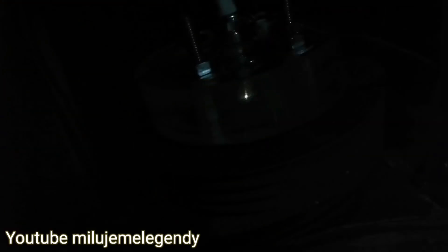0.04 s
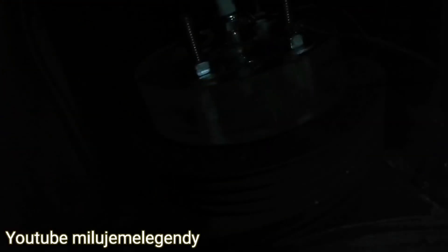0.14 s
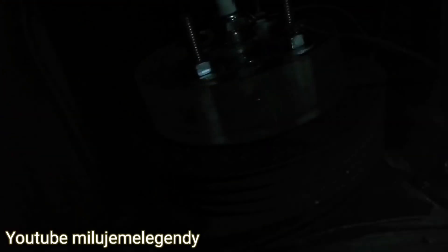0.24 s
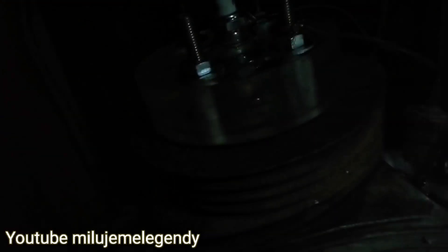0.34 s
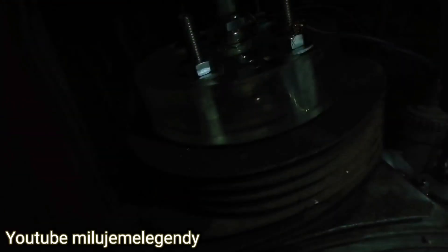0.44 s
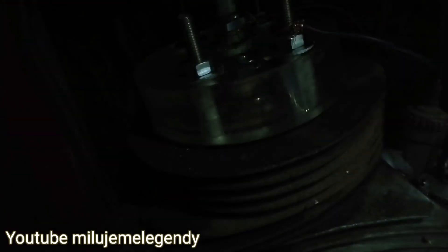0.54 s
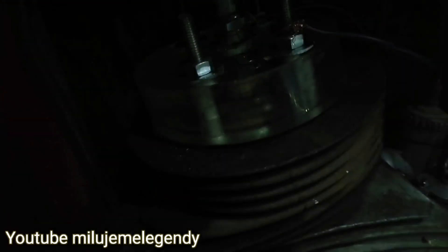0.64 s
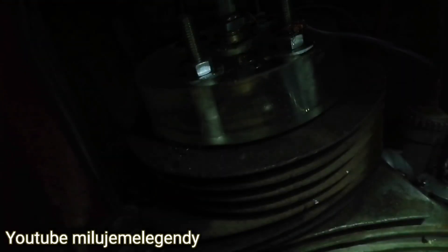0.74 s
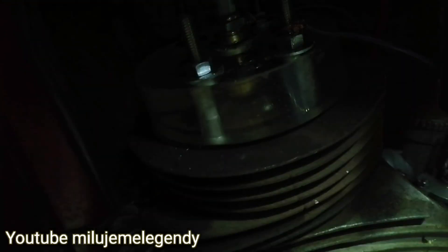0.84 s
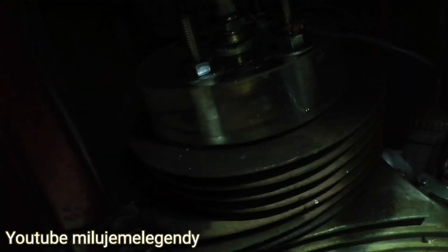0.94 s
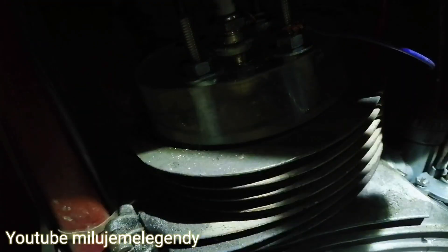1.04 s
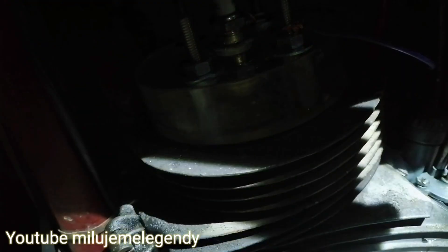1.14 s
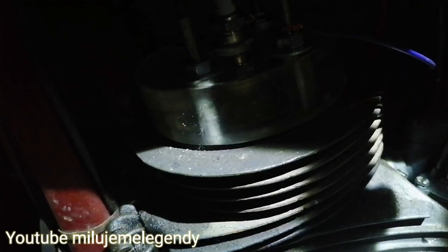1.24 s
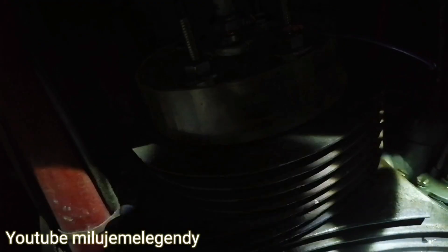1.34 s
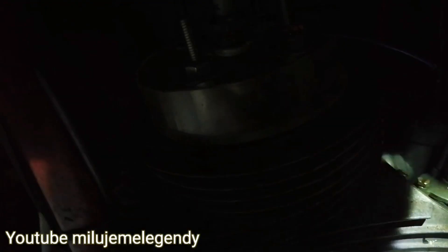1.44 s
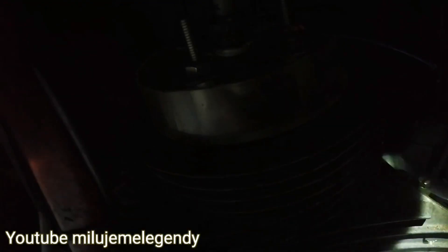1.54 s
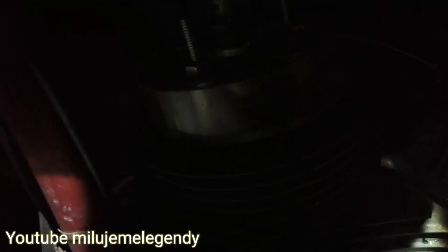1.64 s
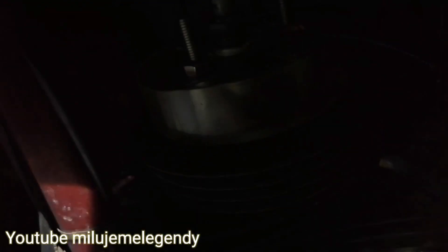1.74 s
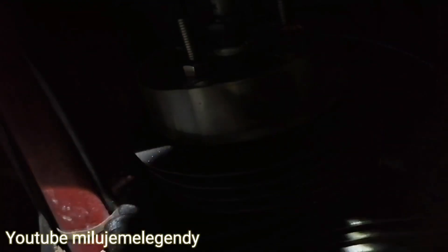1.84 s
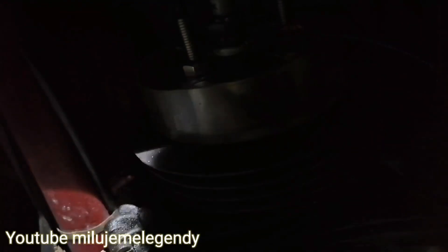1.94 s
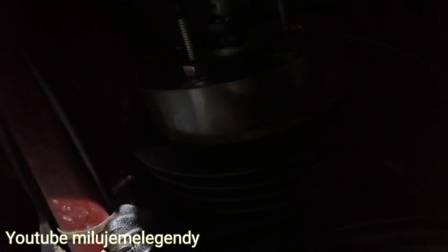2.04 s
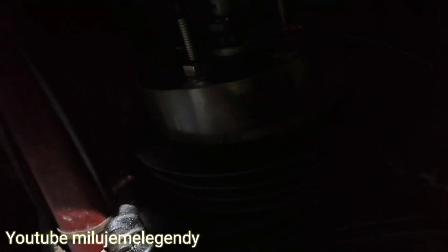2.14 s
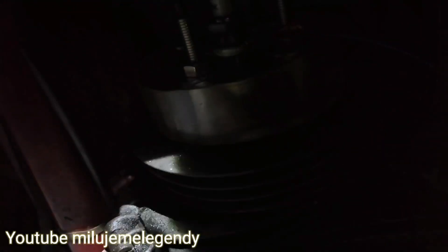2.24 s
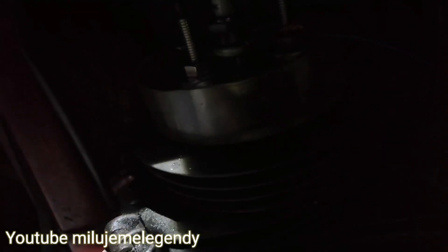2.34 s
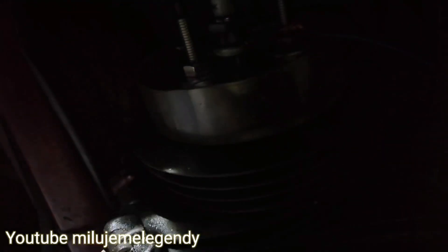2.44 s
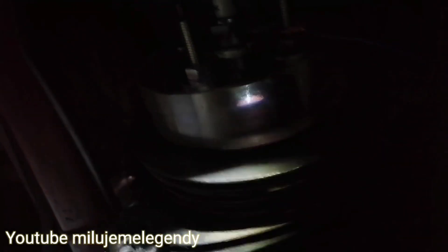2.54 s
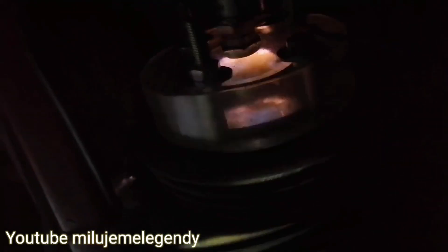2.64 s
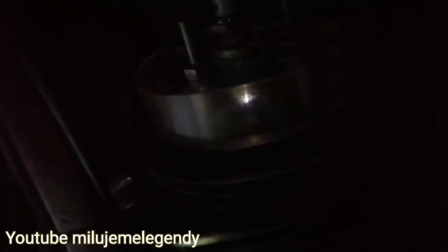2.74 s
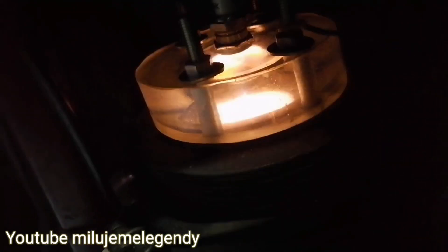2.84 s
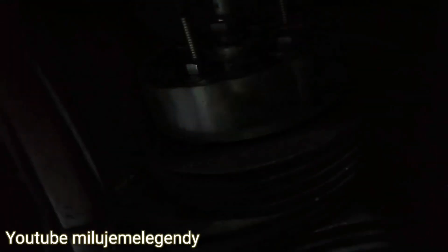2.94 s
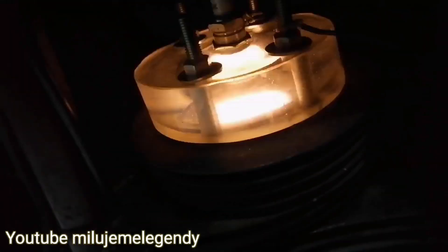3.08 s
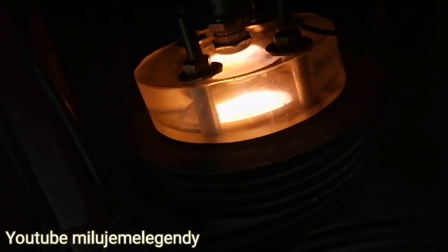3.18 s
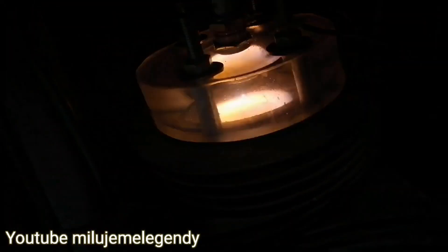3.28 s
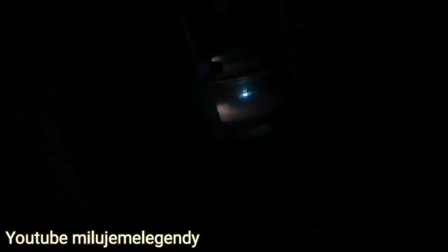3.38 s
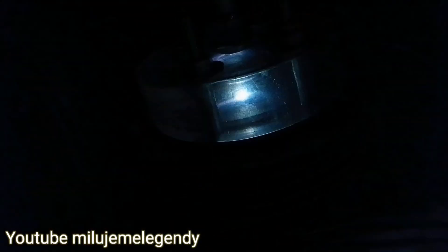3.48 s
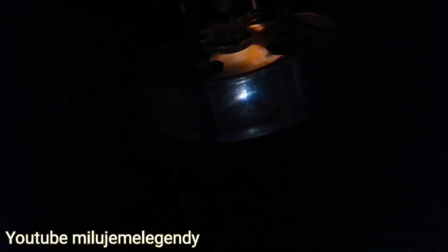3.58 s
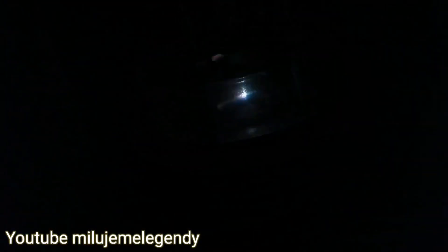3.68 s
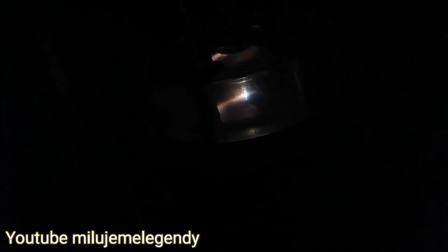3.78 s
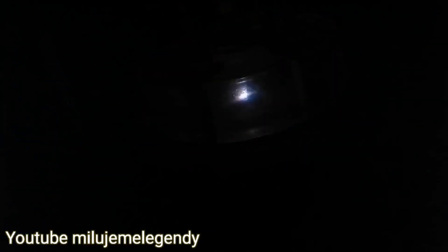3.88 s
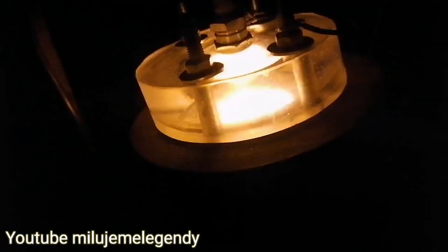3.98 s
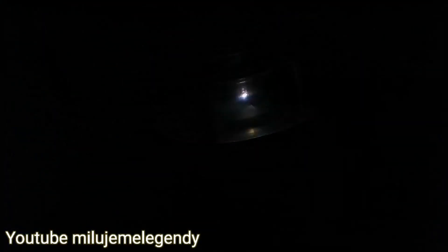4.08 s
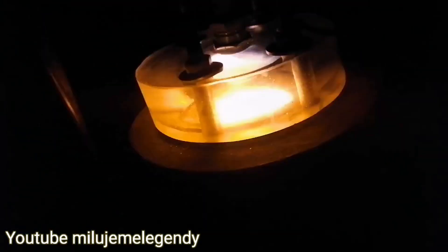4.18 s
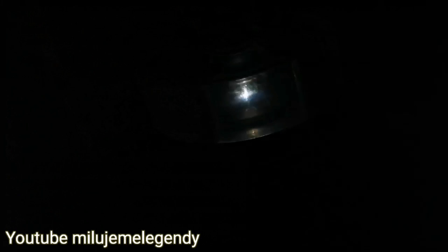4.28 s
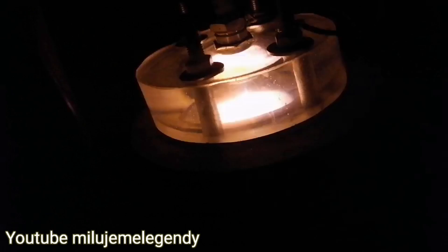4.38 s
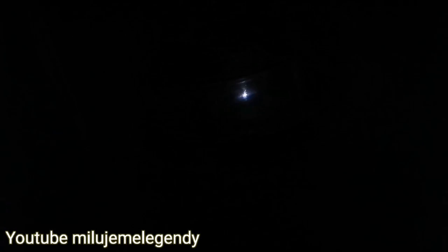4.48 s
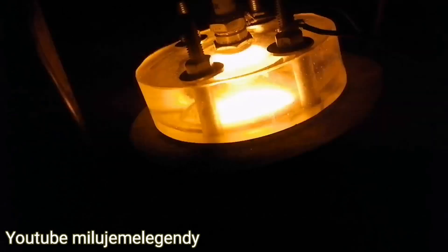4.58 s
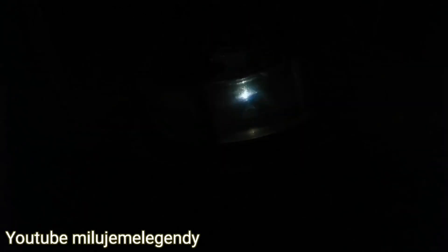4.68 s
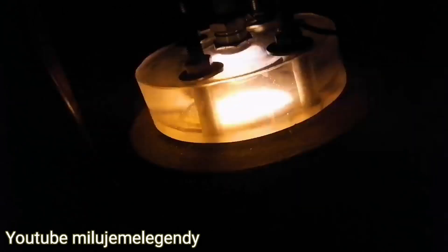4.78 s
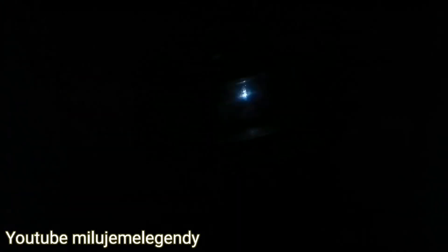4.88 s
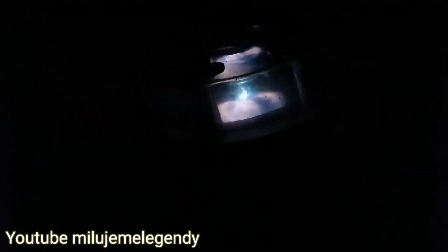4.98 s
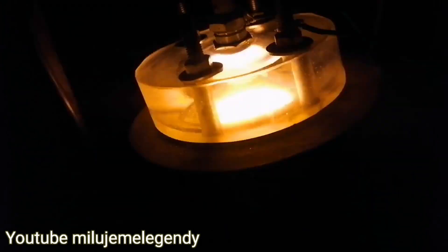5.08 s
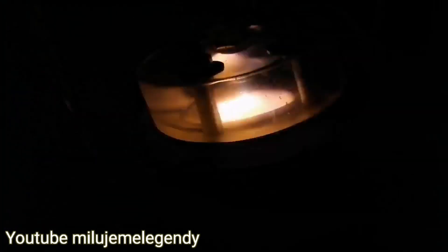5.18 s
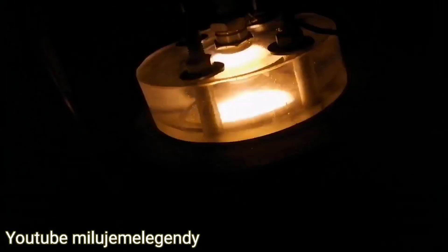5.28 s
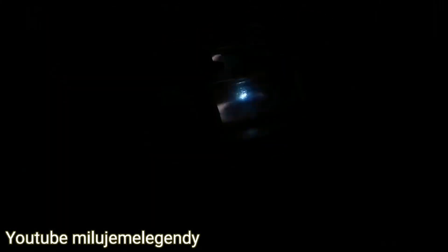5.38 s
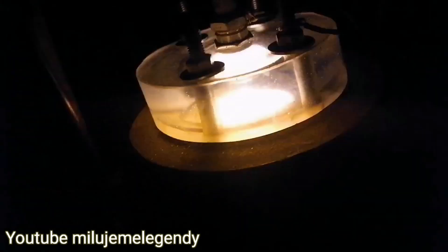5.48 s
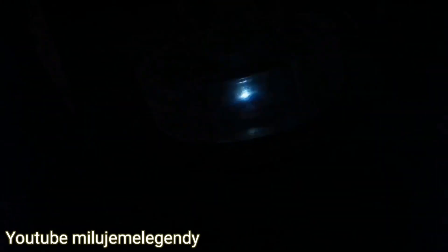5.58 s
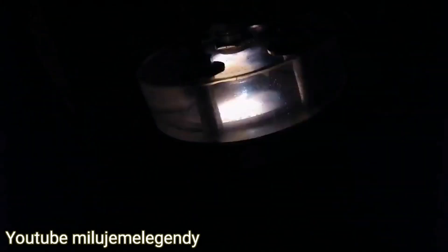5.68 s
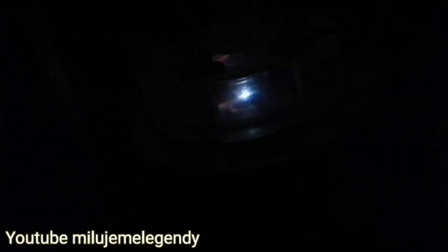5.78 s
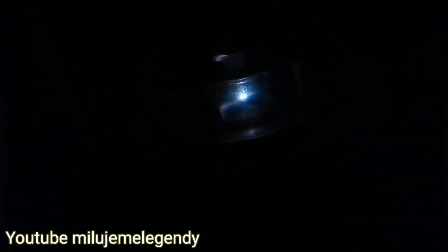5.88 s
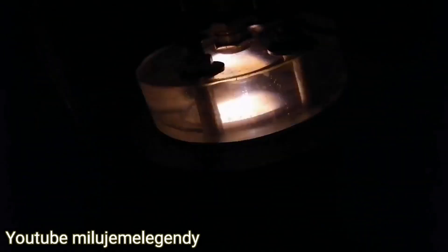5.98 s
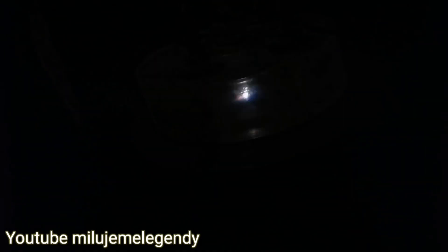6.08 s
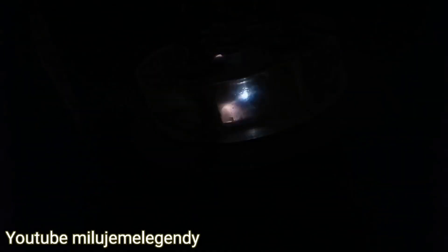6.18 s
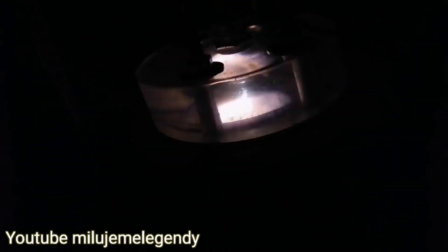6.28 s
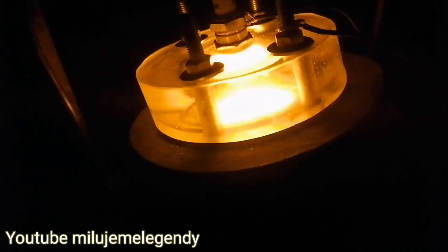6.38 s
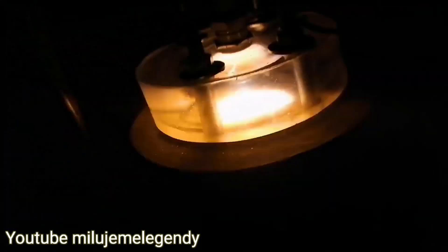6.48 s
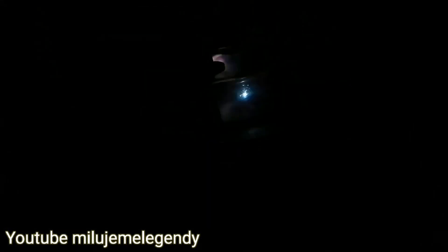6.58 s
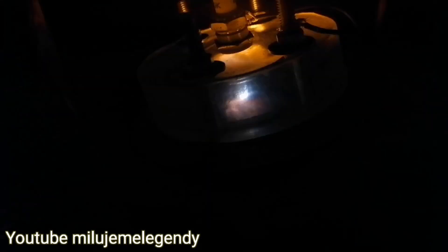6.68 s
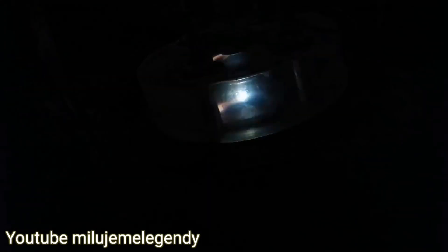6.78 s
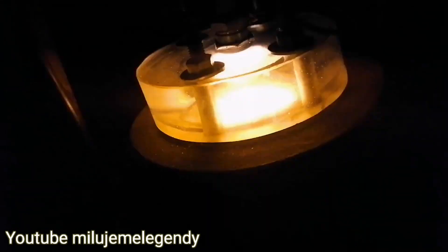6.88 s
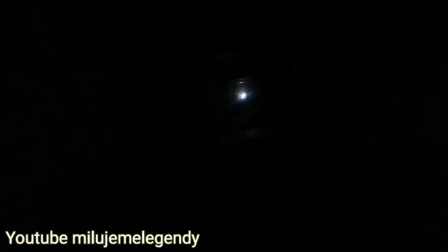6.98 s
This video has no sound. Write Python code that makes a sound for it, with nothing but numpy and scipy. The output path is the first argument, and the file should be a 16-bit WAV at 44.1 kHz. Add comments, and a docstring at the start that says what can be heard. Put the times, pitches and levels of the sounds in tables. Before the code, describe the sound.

A small engine stalls with quick damped knocks, then is almost still apart from isolated metal clicks and soft air. The kick starter is nudged, scrapes, and is kicked hard; its pawl clicks back rapidly as the engine catches. Irregular firing follows, speed surging and sagging, with raspy intake, ringing cylinder and sharp pulsing hiss. Close stereo microphones, dry with a short garage reverberation.

```python
"""A small single-cylinder two-stroke engine, close to the microphones in a garage.
It runs down and stalls (shaped rumble), is nudged over by the kick starter (damped knocks, air wheezing
past the piston), is kicked, and catches while the starter ratchet whirrs back as a train of clicks.
It then sputters on, each firing kicking the crank, whose angle times every periodic source: on each turn
gas hisses out at the head (gated noise), the cylinder rings and the exhaust port pops (excited resonances)."""
import sys
import numpy as np
from scipy import signal
from scipy.fft import rfft, irfft, next_fast_len
from scipy.io import wavfile
from scipy.ndimage import map_coordinates

SR = 44100
rng = np.random.default_rng(int(sys.argv[2]) if len(sys.argv) > 2 else 0)


def to_wav(sig):
    """Store sig (one row per channel, or 1-D mono) as 16-bit WAV at the path in sys.argv[1].

    Samples outside -1..1 are clipped; the rate is SR.
    """
    pcm = np.clip(np.atleast_2d(sig), -1, 1) * 32767
    pcm = np.round(pcm).astype(np.int16)
    wavfile.write(sys.argv[1], SR, pcm.T)  # frames by channels


N = 309582
TIME = np.arange(N) / SR  # seconds
CATCH_S = 3.05  # time at which the engine catches

# The charge burns only now and then. Each row: time in seconds, relative level of the rattle in dB,
# half length in seconds, crank speed gained in turns per second.
FIRINGS = [(3.27, -39.0, 0.026, 7.6), (3.35, -42.0, 0.03, 10.2), (3.45, -39.0, 0.06, 15.2),
           (3.53, -38.0, 0.025, 1.6), (3.715, -30.5, 0.012, 6.2), (3.92, -28.0, 0.008, 2.7),
           (4.03, -29.5, 0.009, 2.9), (4.17, -28.0, 0.007, 4.5), (4.375, -32.0, 0.014, 5.4),
           (4.585, -32.0, 0.018, 5.2), (4.735, -32.0, 0.013, 5.5), (4.96, -33.0, 0.013, 6.3),
           (5.0, -36.0, 0.022, 3.3), (5.24, -37.0, 0.038, 13.7), (5.4, -31.5, 0.013, 10.3),
           (5.49, -33.5, 0.022, 6.0), (5.65, -32.0, 0.014, 7.9), (5.9, -35.5, 0.015, 6.8),
           (6.175, -34.0, 0.016, 5.9), (6.45, -46.0, 0.03, 3.9), (6.535, -35.0, 0.035, 12.2),
           (6.66, -34.0, 0.013, 6.2), (6.815, -32.5, 0.02, 9.5)]
# The piston is pushed along without firing. Each row: time in seconds, half length in seconds,
# relative level of the rush of air in dB, relative level of the rumble in dB.
PUSHES = [(0.247, 0.18, -55, -66), (0.764, 0.038, -63, -74), (1.13, 0.16, -59.5, -58),
          (1.35, 0.18, -52.5, -70), (1.85, 0.086, -59.5, -65), (2.26, 0.064, -61, -69),
          (2.383, 0.037, -46.5, -50), (2.507, 0.042, -67, -55.5), (2.62, 0.033, -47.5, -68),
          (2.724, 0.041, -37.5, -28.5), (2.95, 0.081, -42.5, -42), (3.036, 0.064, -52, -34.5)]
# Resonances of the finned cylinder. Each row: centre in Hz, width in Hz, relative level in dB.
CYLINDER = [(2160, 2500, -23), (2903, 143, 3.5), (2971, 213, 0), (3470, 65, -19.5)]
# Spectrum of rushing air. Each row: frequency in Hz, relative density in dB per Hz.
RUSH = [(200, 8.5), (600, 8), (1200, 9), (1600, 7), (2200, 9), (3200, 7.5), (4000, 1.5), (5200, 7.5),
        (7200, 12), (8400, 7.5), (11000, -0.5), (14000, -3), (16000, -9)]
# Stereo balance of the head leak. Each row: frequency in Hz, left minus right in dB.
LEAK_LEAN = [(2500, -5), (4500, 7), (7000, -15), (8500, -2), (11000, -10), (14500, -19.5)]


def amp(db):
    """Decibels to an amplitude ratio."""
    return 10 ** (np.asarray(db) / 20)


def unit(x):
    """Normalise x to an rms of 1."""
    return x / np.sqrt(np.mean(x ** 2) + 1e-20)


def along(points, hz):
    """Interpolate (Hz, value) points on a logarithmic frequency axis."""
    f, v = np.transpose(points)
    return np.interp(np.log(hz + 1), np.log(f + 1), v)


def curves(rows):
    """Interpolate each column after the time linearly, one value per sample."""
    s, *columns = np.transpose(rows)
    return [np.interp(TIME, s, column) for column in columns]


def wobble(rate):
    """Slow random modulation: a smooth curve through rate random knots a second."""
    knots = rng.standard_normal(int(N * rate / SR) + 4)
    return map_coordinates(knots, [TIME * rate])


def filtered(x, response):
    """Linear filtering: the spectrum of x times a complex response of frequency."""
    m = next_fast_len(N + SR // 2)
    hz = np.fft.rfftfreq(m, 1 / SR)
    return irfft(rfft(x, m) * response(hz), m)[..., :N]


def coloured(x, spectrum):
    """Spectral shaping by (Hz, dB) points, at rms 1."""
    return unit(filtered(x, lambda hz: amp(along(spectrum, hz))))


def resonate(x, modes):
    """Modal response: parallel second-order resonances of alternating sign, at rms 1."""
    def bank(f):
        total = 0
        for k, (centre, width, db) in enumerate(modes):
            damping = 1j * f * width
            total = total + (-1) ** k * amp(db) * damping / (centre * centre - f * f + damping)
        return total
    return unit(filtered(x, bank))


def gliding(x, centre_hz, width_hz):
    """Heterodyning: a fixed low-pass pole on a moving carrier makes one sliding resonance, at rms 1."""
    carrier = np.exp(2j * np.pi * np.cumsum(centre_hz) / SR)
    pole = np.exp(-np.pi * width_hz / SR)
    return unit((signal.lfilter([1], [1, -pole], x / carrier) * carrier).real)


def spread(pair):
    """Partial coherence: two unrelated signals become left and right, alike in the bass."""
    # Each row: frequency in Hz, correlation of left and right.
    alike = [(30, 0.18), (70, 1), (180, 0.72), (350, 0.92), (600, 0.39), (1100, 0.19), (2500, 0.06),
             (8000, 0.011)]

    def mid_side_gains(hz):
        turn = np.arccos(np.clip(along(alike, hz), -1, 1)) / 2
        return np.array([np.cos(turn), np.sin(turn)])
    mid, side = filtered(pair, mid_side_gains)
    return np.array([mid + side, mid - side])


def noise():
    """Stereo random noise, partly coherent between the channels."""
    return spread(rng.standard_normal((2, N)))


def panned(x, db):
    """Level difference between the channels: x leaning left by db."""
    return x * amp(np.array([[.5], [-.5]]) * db)


def leaning(x, lean):
    """Frequency-dependent level difference between the channels, with an overall gain of 0.91."""
    return filtered(x, lambda hz: panned(0.91, along(lean, hz)))


def swells(rows):
    """Gaussian envelopes, one for each (s, dB, half length) row, summed in power."""
    power = 0
    for s, db, half in rows:
        power = power + amp(db) ** 2 * np.exp(-np.minimum(((TIME - s) / half) ** 2, 60))
    return np.sqrt(power)


def add(track, s, sound):
    """Superposition: mix a sound in at time s."""
    start = max(round(s * SR), 0)
    track[..., start:start + sound.shape[-1]] += sound[..., :N - start]


def level_running(gate):
    """Normalise a gate to rms 1 over the time after the engine catches."""
    return gate / np.sqrt(np.mean(gate[TIME > CATCH_S] ** 2))


def stroke(turns, centre, width, rest_db, scatter_db):
    """Periodic gating: opens once a turn around a crank angle, each time with new strength."""
    angle = turns - centre + .5
    size = amp(scatter_db * rng.standard_normal(256))[np.floor(angle).astype(int)]
    return level_running(size * np.exp(-((angle % 1 - .5) / width) ** 4) + amp(rest_db))


def blows(turns, angle, scatter_db):
    """Impulsive excitation: one sharp blow a turn at a crank angle, each of new strength."""
    count = np.arange(int(turns[-1]) + 1)
    at = np.searchsorted(turns, count + max(angle, 1e-6))
    strength = amp(scatter_db * rng.standard_normal(len(count)))
    return unit(np.bincount(at, strength, N + 1)[:N])


def engine():
    """Crank-synchronous sources: exhaust, intake, burning, cylinder, leak (angle 0 = top of the stroke)."""
    cruise_speed = 36  # turns per second
    boom_delay_s, boom_half_s = 0.037, 0.023
    speed = crank()
    running = np.clip((TIME - CATCH_S) / 0.013, 0, 1)
    turns = np.cumsum(speed * (running > 0)) / SR
    octaves = np.log2(speed / cruise_speed)
    fired = swells([(s + boom_delay_s, 0, boom_half_s) for s, *_ in FIRINGS])
    # The throttle. Each row: time in seconds, relative exhaust level in dB,
    # intake roar at cruising speed in dB.
    throttle = [(3.05, -32.5, -53), (3.2, -30.5, -48), (3.28, -31, -29.5), (3.5, -26, -34.5),
                (3.7, -26.5, -32), (4.0, -22.5, -32.5), (4.2, -25.5, -37.5), (4.48, -24.5, -39.5),
                (5.15, -26, -38), (5.32, -28, -33), (5.6, -25.5, -38), (5.95, -26.5, -34),
                (6.2, -25.5, -35), (6.4, -27, -38.5), (6.65, -28, -38), (7.02, -28, -33)]
    exhaust_db, intake_db = curves(throttle)
    flow = intake(turns)
    pops = amp(exhaust_db - 4.5) * exhaust(turns, fired)
    sources = pops + roar(flow, intake_db, octaves) + burn(flow)
    return running * (sources + cylinder_ring(turns, octaves) + wash(octaves) + head_leak(turns))


def crank():
    """Angular momentum: each firing kicks the crank (turns per second) and drag slows it exponentially."""
    catch_speed, drag_per_s = 24.2, 1  # turns per second; rate of the exponential slowing, per second
    kicks = 0
    for s, _, half, gain in FIRINGS:
        bell = np.exp(-np.minimum(((TIME - s) / half) ** 2, 60))
        kicks = kicks + gain * bell / (half * np.sqrt(np.pi))
    coasting = np.exp(-drag_per_s * np.maximum(TIME - CATCH_S, 0))
    return coasting * (catch_speed + np.cumsum(kicks / coasting) / SR)


def exhaust(turns, fired, port=0.1901, swing=0.4794, sway_db=2, throb_db=-8, boom_db=-7):
    """Pipe resonance: a pulse and a gush each turn ring it over a harmonic throb, which booms after a firing."""
    # Resonances of exhaust and crankcase. Each row: centre in Hz, width in Hz, relative level in dB.
    pipe = [(62, 11, -21), (96, 17, -18), (124.3, 16, -2.5), (138.8, 13, 1.5), (202.4, 11.6, -0.5),
            (256.3, 28, -1.5), (328, 63, -0.5), (368.6, 34.4, 3), (392, 126, -8.5), (533, 193, -6.5),
            (572, 93, -5.5)]
    # The smooth pressure swing of each turn. Each row: multiple of crank speed, relative level in dB.
    orders = [(1, -9.5), (2, -7), (3, 2), (4, 1.5), (5, -6), (6, -12.5), (7, -10), (8, -7), (9, -7),
              (10, -4)]
    # The silencer's resonance: centre in Hz, width in Hz, relative level in dB.
    silencer = (143, 30, 0)
    fired_gain_db = 2.5
    rough = .35  # share of power in the gush
    gush = noise() * stroke(turns, centre=.33, width=.16, rest_db=-8, scatter_db=2) * (turns > 0)
    pulses = blows(turns, port, scatter_db=2)
    pops = resonate(np.sqrt(1 - rough) * pulses + np.sqrt(rough) * unit(gush), pipe)
    throb = 0
    for k, db in orders:  # each order swells and fades at random
        phase = 2 * np.pi * k * (turns - swing) + .5 * wobble(3.028)
        throb = throb + amp(db + sway_db * wobble(9)) * np.cos(phase)
    throb = throb * (turns > 0)
    low = amp(throb_db) * unit(throb) + amp(boom_db) * resonate(throb, [silencer])
    return unit(pops + amp(fired_gain_db * fired) * low)


def intake(turns):
    """Modulated port flow: a buzz of crank harmonics mixed with turbulence, in three gusts a turn."""
    # Gas rushes as the ports open and close. Each row: crank angle in turns, half width in turns,
    # relative level in dB.
    port_gusts = [(.1, 0.096, -7.5), (0.449, 0.097, -0.5), (.78, .08, 0)]
    rough = .3  # share of power in the turbulence
    buzz = 0
    for k in range(10, 40):
        phase = 2 * np.pi * (k * turns + rng.random((2, 1)))
        buzz = buzz + np.cos(phase) / (1 + (k / 25) ** 6)
    gusts = 0
    for centre, width, db in port_gusts:
        gusts = gusts + amp(db) * stroke(turns, centre, width, rest_db=-12.5, scatter_db=3.5)
    mixture = np.sqrt(1 - rough) * unit(spread(buzz)) + np.sqrt(rough) * unit(noise())
    return gusts * mixture * (turns > 0)


def roar(flow, intake_db, octaves):
    """Cavity resonance: the flow excites the air box and one rasping resonance that slides."""
    # Resonances of the air box. Each row: centre in Hz, width in Hz, relative level in dB.
    airbox = [(397, 180, 0), (593, 56, 5.5), (722, 230, 1), (895, 56, -3.5), (1214, 120, -9),
              (1520, 300, -16), (2080, 900, -25)]
    # The sliding resonance. Each row: time in seconds, centre in Hz, relative level in dB.
    rasp = [(3.2, 880, -42), (3.42, 925, -41.5), (3.53, 960, -29.5), (3.64, 887, -33), (3.85, 946, -30.5),
            (3.95, 975, -33), (4.15, 930, -43.5), (4.5, 917, -38.5), (5.18, 893, -42), (5.35, 900, -37.5),
            (5.5, 892, -34), (5.7, 894, -41), (5.92, 922, -33.5), (6.2, 896, -38), (6.4, 910, -47),
            (6.7, 900, -38), (7.02, 955, -37.5)]
    # Balance of the air box. Each row: frequency in Hz, left minus right in dB.
    airbox_lean = [(450, 0.5), (700, 1), (900, 13.5), (1250, -7), (2000, -12)]
    db_per_octave = 7  # growth for each doubling of crank speed
    rasp_hz, rasp_db = curves(rasp)
    box = amp(intake_db + db_per_octave * octaves) * resonate(flow, airbox)
    rasping = amp(rasp_db - 4.5) * gliding(flow, rasp_hz, width_hz=86)
    return leaning(box + rasping, airbox_lean)


def burn(flow):
    """Transient combustion noise: a dull burst at each firing, made by shaping the port flow."""
    # Each row: frequency in Hz, relative density in dB per Hz.
    burst_spectrum = [(200, -21), (550, 5), (900, -8.5), (1300, -2.5), (2200, 0), (4000, -24)]
    level_db, half_s = -37.5, 0.035
    bursts = swells([(s, level_db, half_s) for s, *_ in FIRINGS])
    return bursts * coloured(flow, burst_spectrum)


def cylinder_ring(turns, octaves):
    """Structure-borne ringing: grows with crank speed and with each hard slap of the piston."""
    # Times at which the piston slaps hard. Each row: time in seconds, gain in dB.
    hard_slaps = [(3.236, 3.5), (3.282, 2), (3.467, 11.5), (3.534, 5), (3.63, 4.5), (3.655, 6),
                  (3.703, 6.5), (3.91, 8.5), (4.018, 8), (4.372, 5.5), (4.59, 5.5), (4.75, 7.5),
                  (4.81, 4.5), (5.19, 9.5), (5.28, 5.5), (5.415, 3), (5.47, 4.5), (5.86, 10), (6.163, 4.5),
                  (6.512, 2.5), (6.625, 2.5), (6.665, 2.5), (6.806, 7.5), (6.828, -1)]
    ring_db, db_per_octave, half_s = -45.5, 5, 0.015  # level is that at cruising speed
    hard_db = sum(db * swells([(s, 0, half_s)]) for s, db in hard_slaps)
    return amp(ring_db + db_per_octave * octaves + hard_db) * slap(turns)


def slap(turns, blow_db=-13):
    """Modal excitation: the piston scrapes and slaps the cylinder about the top of each stroke."""
    gate = stroke(turns, centre=0.0071, width=0.13, rest_db=-14.0, scatter_db=2.2)
    scrape = unit(noise() * gate * (turns > 0))
    slaps = amp(blow_db) * blows(turns, angle=.02, scatter_db=2)
    return panned(resonate(scrape + slaps, CYLINDER), db=11.0)


def head_leak(turns, leak_db=5.5, wide_db=-4, gap_sway_db=3):
    """Turbulent jet noise: puffs of gas through a shifting gap, whistling when narrow, broad when wide."""
    # The leak when the gap opens wide. Each row: frequency in Hz, relative density in dB per Hz.
    wide_leak = [(1500, -25), (3000, -16), (4200, -2), (5500, 4.5), (7200, 9.5), (9000, 2), (11000, -4),
                 (13500, -3), (15300, 9), (16200, -14)]
    gap_db = gap_sway_db * wobble(13)
    narrow = amp(-.5 * gap_db) * hiss()
    wide = amp(wide_db + gap_db) * leaning(coloured(noise(), wide_leak), LEAK_LEAN)
    return amp(leak_db) * seal() * puffs(turns) * unit(narrow + wide)


def hiss():
    """Jet noise: gas through the narrow gap at the head, its balance varying with frequency."""
    # Each row: frequency in Hz, relative density in dB per Hz.
    leak_spectrum = [(1000, -7), (2500, -2), (4000, -3.5), (5500, 11), (6300, -2.5), (7100, 14),
                     (8500, -2.5), (9900, 9), (11000, -9), (12600, 4), (13600, -15), (14200, 0),
                     (14950, 11.5), (15800, -32)]
    return unit(leaning(coloured(noise(), leak_spectrum), LEAK_LEAN))


def seal():
    """Leakage past a seal: a steady seep and spells of blowing set the jet's strength."""
    # Spells of blowing. Each row: start in seconds, end in seconds, relative level in dB.
    spells = [(3.158, 3.522, -39.5), (4.59, 5.1, -42), (5.102, 5.515, -41.5), (6.307, 6.757, -40.5)]
    seep_db, edge_s = -48, 0.06  # level between the spells; how fast a spell opens and closes
    strength = amp(seep_db)
    for start, end, db in spells:
        opened = np.clip(np.minimum(TIME - start, end - TIME) / edge_s + .5, 0, 1)
        strength = strength + (amp(db) - amp(seep_db)) * opened
    return strength


def puffs(turns):
    """Pressure-driven gating: each puff starts abruptly before the top of the stroke and fades."""
    start, rise, length = -.165, .005, .26  # turns of the crank
    angle = (turns - start) % 1
    return level_running(amp(wobble(30)) * (1 - np.exp(-angle / rise)) * np.exp(-(angle / length) ** 2))


def wash(octaves):
    """Broadband friction noise: chain and bearings, louder with crank speed."""
    level_db, db_per_octave = -41.5, 11  # level is that at cruising speed
    return amp(level_db + db_per_octave * octaves) * coloured(noise(), RUSH)


def turning_over(lump_db=2.5):
    """Unfired rotation: low noise as the crank runs down or is pushed, and hisses at the head."""
    # Wheezes of compression strokes at the head, and a short hiss with the clack at 1.087 s.
    # Each row: time in seconds, relative level in dB, half length in seconds.
    head_hisses = [(.012, -34.5, 0.012), (.045, -42, 0.0084), (.097, -33, 0.0022), (.107, -36.5, 0.0077),
                   (.124, -39.5, 0.011), (.178, -41, 0.0095), (.28, -37, 0.012), (.334, -39.5, 0.01),
                   (.485, -56, 0.015), (.57, -65, 0.016), (1.0, -52, 0.0096), (1.087, -31, 0.0012),
                   (2.712, -31, 0.0081), (2.742, -32.5, 0.0051), (2.781, -31, 0.0043)]
    # Spectra of the running down and of the pushed crank.
    # Each row: frequency in Hz, relative density in dB per Hz.
    rumble_spectrum = [(20, -15), (40, -8), (60, 2), (85, -2.5), (120, 6), (190, -7.5), (300, -0.5),
                       (450, -9.5), (600, -5.5), (800, -12), (1500, -30), (3000, -25), (8000, -67)]
    grind_spectrum = [(25, -24), (70, 3), (130, -1.5), (300, 7), (500, -8.5), (800, -7.5), (1500, -32),
                      (3000, -13), (8000, -51)]
    rundown_db, stall_s, power = -33.5, 0.8, 1.47  # rumble follows this power of the falling speed
    rundown = amp(rundown_db) * np.clip(1 - TIME / stall_s, 0, 1) ** power
    pushed = swells([(s, db, half) for s, half, _, db in PUSHES])
    rumble = rundown * coloured(noise(), rumble_spectrum) + pushed * coloured(noise(), grind_spectrum)
    lumps = amp(lump_db * (wobble(30.5) - 0.5))
    return rumble * lumps + amp(5.0) * swells(head_hisses) * hiss()


def rush(eddy_db=-2.1):
    """Turbulent flow: air drawn slowly past the piston on each push, in uneven gusts."""
    drawn = swells([(s, db, half) for s, half, db, _ in PUSHES])
    return drawn * amp(0.5 + eddy_db * wobble(39.92)) * coloured(noise(), RUSH)


def clacks(knock_t60=0.063, ring_t60=0.028, crack_t60=0.044, attack_s=0.00047):
    """Impact: each contact excites a knock of the casing, a ring of the cylinder and a short crack."""
    # Metal contacts of starter and gears. Each row: time in seconds, relative level in dB, then the
    # relative levels of knock, cylinder ring and crack in dB, and left minus right in dB.
    contacts = [(0.0948, -28.5, -24, -23, -13.5, -7), (0.1506, -27, -22, -19, -3, -2),
                (0.2119, -43, -24, -12, -4, -2.0), (0.364, -38, -32, -20, -1, -2),
                (0.398, -32, -20, -30, -5.5, -5), (0.484, -28.5, -37, -23, -5.5, -3.5),
                (0.5534, -44.5, -3.5, -19, -5, 1), (0.6464, -63, -22, -21, -2, -9),
                (0.7303, -88.5, 20, 24.5, 21, -16), (0.966, -48.5, -5.5, -16, -6, 0),
                (1.001, -43.5, -13, -15, -17, -5), (1.068, -46, -30, -6, -12, -5),
                (1.189, -59, -12, -20, -12, -2), (1.0835, -23.5, -22, -23, -4, 2.5),
                (1.542, -29, -22, -13, -4, -1), (2.0373, -36.5, -22.5, -16, -9, 8.5),
                (2.087, -54, -6, -16, -14, -5), (2.159, -46.5, -38, -4.5, -6, 2),
                (2.282, -38.5, -10.5, -8.5, -5, -2), (2.302, -35.5, -13, -4.5, -6, 4),
                (2.3401, -25, -30, -16.5, -6, 0), (2.567, -40, -22, -12, -14, 3),
                (2.6452, -27, -15, -12.5, -4.5, 2), (2.79, -13, -26, -33, -4.5, 3),
                (3.0358, -24, -23, -20, -4, 0), (3.1174, -25, -20, -8, -5, -2)]
    # Spectra of knock and crack. Each row: frequency in Hz, relative density in dB per Hz.
    knock_spectrum = [(100, -33), (350, -1), (1000, 7.5), (2000, 2), (2800, -8), (5000, -40)]
    crack_spectrum = [(1500, -27), (3200, 11.5), (4200, 4), (5200, 12.5), (6800, 14.5), (8300, 11),
                      (11000, -4), (13000, -4), (16000, -18)]
    knock, ring, crack = np.zeros((3, 2, N))
    t = np.arange(SR // 4) / SR
    for s, db, knock_db, ring_db, crack_db, pan_db in contacts:
        blow = panned(amp(db) * (1 - np.exp(-t / attack_s)), pan_db)
        add(knock, s, blow * amp(knock_db + 8.5 - 60 * t / knock_t60))
        add(ring, s, blow * amp(ring_db + 10.5 - 60 * t / ring_t60))
        add(crack, s, blow * amp(crack_db + 2.0 - 60 * t / crack_t60))
    knocking = knock * coloured(noise(), knock_spectrum)
    ringing = ring * resonate(noise(), CYLINDER)
    return knocking + ringing + crack * coloured(noise(), crack_spectrum)


def thumps(puff_lasts=1.7, hardness_db=3):
    """Damped oscillation: swings of the engine's mass with a puff of air, stronger at higher pitch."""
    # Dull knocks and chuffs of the crankcase. Each row: time in seconds, relative level in dB,
    # pitch in Hz, time of the swing's 60 dB decay in seconds.
    knocks = [(.012, -29, 320, 0.042), (0.029, -25.5, 193, 0.033), (.048, -17, 99, 0.045),
              (0.08, -26, 152, 0.091), (.183, -24, 70.5, 0.053), (0.256, -27.5, 78, 0.063),
              (.34, -24.5, 124, 0.057), (0.501, -35, 248, 0.047), (1.002, -28.5, 430, 0.013),
              (1.02, -52, 290, 0.059), (1.0842, -30.5, 500, .015), (1.537, -33, 290, .035),
              (1.541, -24.5, 135, 0.024), (1.877, -49, 242, .04), (2.028, -25, 158, 0.023),
              (2.036, -29.5, 284, 0.048), (2.16, -43.5, 292, 0.054), (2.289, -32, 268, 0.045),
              (2.308, -33.5, 354, 0.051), (2.407, -35, 262, .04), (2.646, -23, 359, 0.027),
              (2.667, -19.5, 256, 0.043), (2.748, -15, 320, 0.045), (2.751, -15.5, 104, 0.048),
              (2.77, -25.5, 340, 0.045), (2.888, -34.5, 298, 0.091), (2.984, -36, 218, 0.043),
              (3.151, -24.5, 143, 0.086), (3.201, -19, 146, 0.039), (3.251, -19.5, 338, 0.066),
              (3.305, -19, 337, 0.046)]
    swing, puff = np.zeros((2, N))
    t = np.arange(SR // 4) / SR
    for s, db, hz, t60 in knocks:
        rise = 1 - np.exp(-(3 * hz * t) ** 2)
        add(swing, s, rise * amp(db + 3.5 - 60 * t / t60) * np.sin(2 * np.pi * hz * t))
        puff_db = db - 4.0 + hardness_db * np.log2(hz / 300)
        add(puff, s, rise * amp(puff_db - 60 * t / (puff_lasts * t60)))
    air = coloured(noise(), [(30, -20), (80, -4.0), (300, 3.5), (600, -2.0), (1200, -14.5), (3000, -31.5)])
    return swing + puff * air


def ratchet(tooth_decay=0.44):
    """Repeated impact: the starter pawl drops off one tooth after another as it springs back."""
    # Each row: time in seconds, teeth per second, relative level in dB.
    whirr = [(2.80, 55, -29.5), (2.87, 63, -31.5), (2.91, 72, -28), (3.0, 80, -29.5), (3.037, 76, -28),
             (3.05, 100, -32), (3.08, 90, -45)]
    rate, db = curves(whirr)
    moving = (TIME > whirr[0][0]) & (TIME < whirr[-1][0])
    teeth = np.cumsum(rate * moving) / SR
    clicks = np.exp(-(teeth % 1) / tooth_decay) * moving  # decay in tooth spacings
    steel = [(1200, -61), (2400, 2.5), (3200, 8.5), (8000, 12.5), (11000, 0.5), (16000, -1)]
    return amp(db + 3.5) * clicks * coloured(noise(), steel)


def rattle(level_db=2.0, grain_db=1.0):
    """Dense random impacts: each firing shakes loose metal, heard as a short burst of grainy noise."""
    # Each row: frequency in Hz, relative density in dB per Hz.
    metal = [(150, -19), (700, 16), (1700, 1.5), (3200, 9), (4000, -0.5), (5200, 5.5), (6800, 8),
             (8300, 6.5), (11000, 3), (13000, -1), (16000, -40)]
    chatter = noise() * amp(grain_db * wobble(900))
    bursts = swells([(s, db + level_db, half) for s, db, half, _ in FIRINGS])
    return bursts * panned(coloured(chatter, metal), db=-0.5)


def groans(waver=0.82, flutter_db=3):
    """Frictional vibration: short tones with randomly modulated phase (radians) and strength."""
    # Frame and gears groan and ring while the crank creeps. Each row: time in seconds,
    # relative level in dB, half length in seconds, pitch in Hz.
    tones = [(0.1, -24, 0.0052, 1042), (0.204, -36.5, 0.043, 133.1), (0.283, -36, 0.009, 562),
             (0.281, -37, 0.0066, 965), (0.348, -47, 0.29, 60.2), (0.43, -42, 0.032, 116),
             (0.584, -44, 0.037, 599), (0.75, -72, 0.1, 598), (2.041, -31.5, 0.005, 85),
             (2.087, -49, 0.011, 317), (2.317, -41.5, 0.0098, 956), (2.46, -41.5, 0.021, 223.3),
             (2.445, -41, 0.012, 340), (2.532, -48, 0.01, 238), (2.676, -22.5, 0.012, 265.6),
             (2.72, -42, 0.027, 300), (2.769, -29, 0.014, 149.7)]
    drift = waver * wobble(70)
    flutter = unit(amp(flutter_db * wobble(90)))
    total = 0
    for s, db, half, hz in tones:
        total = total + swells([(s, db, half)]) * np.sin(2 * np.pi * hz * TIME + drift)
    return flutter * total


def scrapes(grain_db=3):
    """Dry friction: the steel starter lever rubs on its shaft in short, grainy strokes of noise."""
    # Each row: time in seconds, level in dB, half length in seconds.
    rubs = [(2.3, -39, 0.0076), (2.355, -61, 0.022), (2.42, -44.5, 0.016), (2.47, -62, 0.022)]
    # Each row: frequency in Hz, relative density in dB per Hz.
    rub_spectrum = [(250, -19), (500, 9), (900, -6), (2000, -18), (3500, -8), (8000, -45)]
    return swells(rubs) * coloured(noise() * amp(grain_db * wobble(270)), rub_spectrum)


def garage(x):
    """Reverberation: the walls answer with decaying noise, each frequency at its own rate."""
    # Each row: frequency in Hz, time of 60 dB decay in seconds.
    decay = [(100, 0.47), (600, 0.47), (3000, 0.091), (12000, 0.21)]
    # Each row: frequency in Hz, level of the walls' answer in dB.
    wet = [(100, -13.5), (1000, -9), (4000, -7), (14000, -21)]
    hz, t, z = signal.stft(rng.standard_normal((2, SR // 2)), SR, nperseg=256)
    tail = signal.istft(z * amp(-60 * t / along(decay, hz)[:, None]), SR, nperseg=256)[1]
    tail = np.pad(tail / np.linalg.norm(tail[0]), ((0, 0), (SR // 200, 0)))  # 5 ms before the walls answer
    answer = spread(signal.fftconvolve(x, tail, axes=1)[:, :N])
    return filtered(answer, lambda hz: amp(along(wet, hz)))


def floor():
    """Ambient noise: the faint steady still air of the room."""
    level_db = -72.5
    return amp(level_db) * coloured(noise(), [(30, 20), (300, 10), (1500, -2), (6000, -8), (16000, -9)])


def scene(lag_s=0.000322):
    """Arrival-time difference: all sources in the garage reach the nearer, right microphone first."""
    # Balance of all the sources. Each row: frequency in Hz, left minus right in dB.
    lean = [(40, -5), (130, -4), (350, -7), (700, -1.5), (1300, -0.5), (2400, 0), (4400, -2.5), (8300, 1),
            (15000, -1)]
    near = engine() + turning_over() + rush() + groans() + scrapes()
    near = near + rattle() + ratchet() + clacks() + thumps()
    both = leaning(near + garage(near), lean) + floor()
    half_lags = lag_s * np.array([[.5], [-.5]])
    return filtered(both, lambda hz: np.exp(-2j * np.pi * hz * half_lags))


def record(dry):
    """Band limiting: a very steep low-pass filter."""
    top_hz = 15750
    return filtered(dry, lambda hz: 1 / np.sqrt(1 + (hz / top_hz) ** 120))


dry = scene()
out = record(dry)
to_wav(out)
```